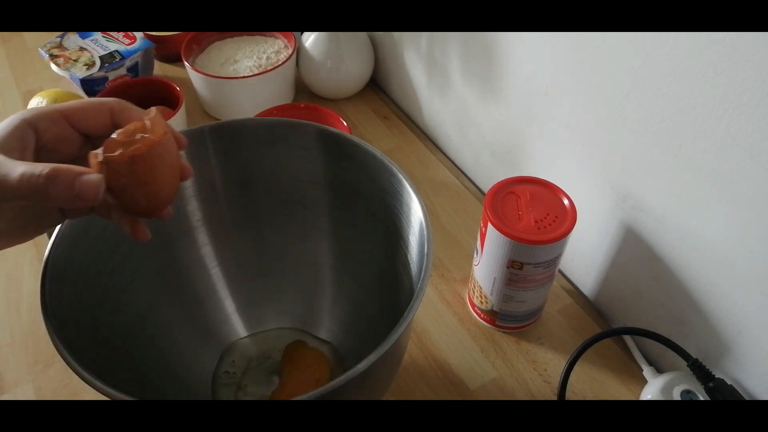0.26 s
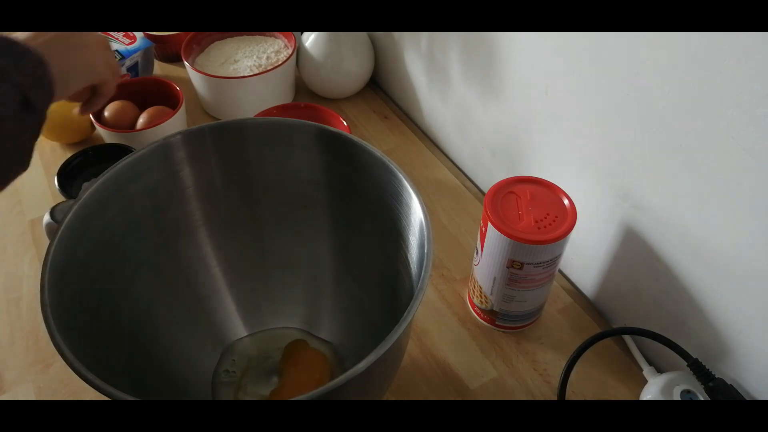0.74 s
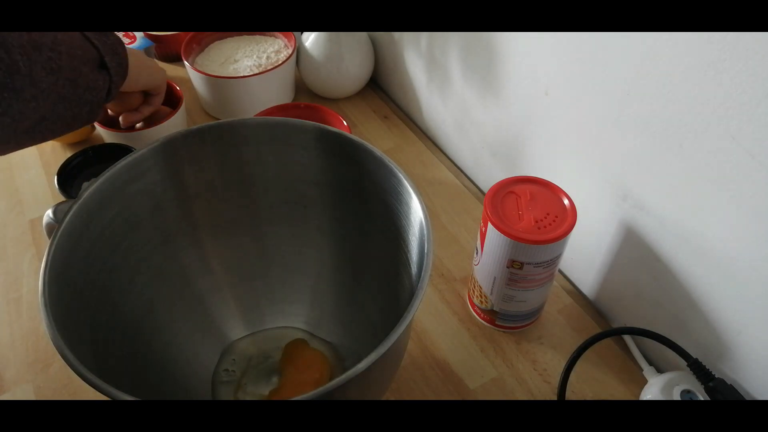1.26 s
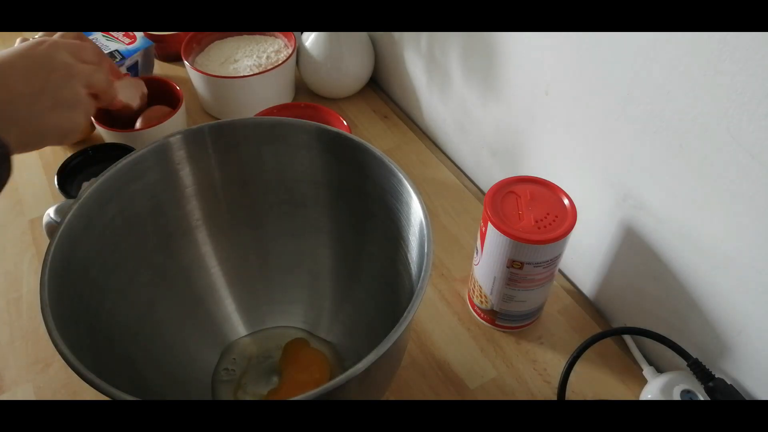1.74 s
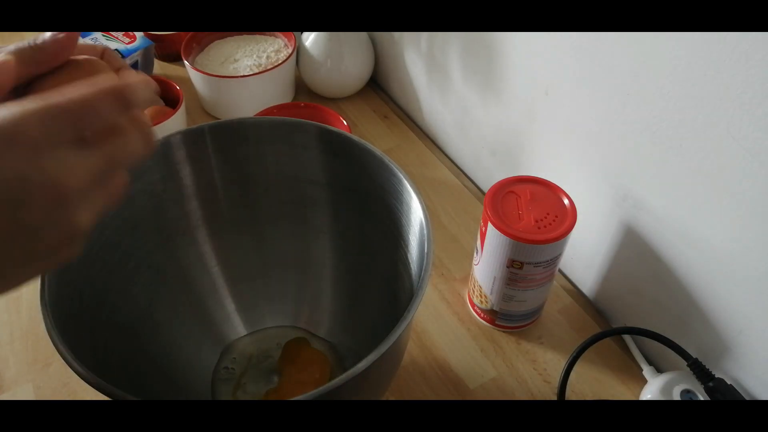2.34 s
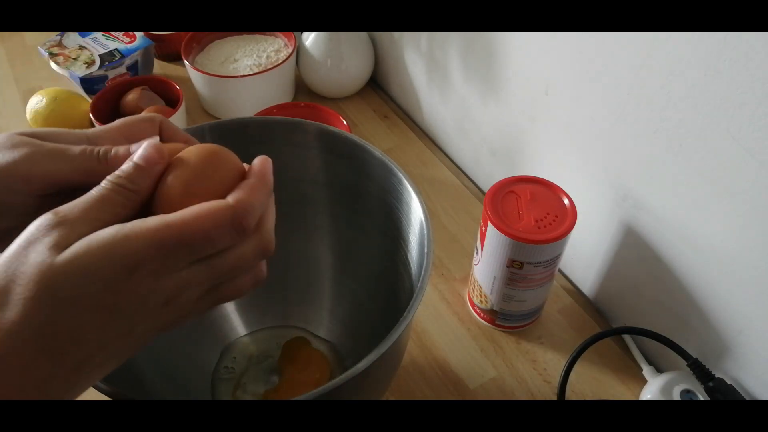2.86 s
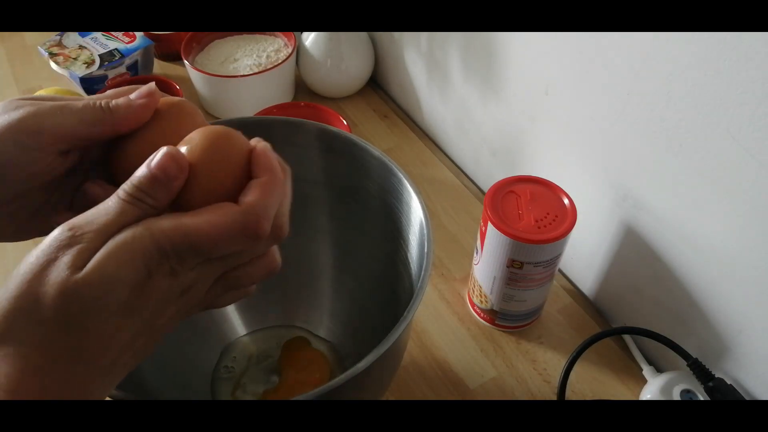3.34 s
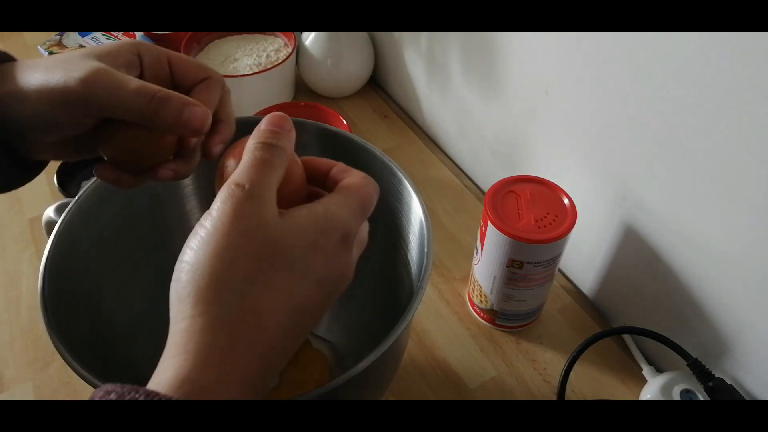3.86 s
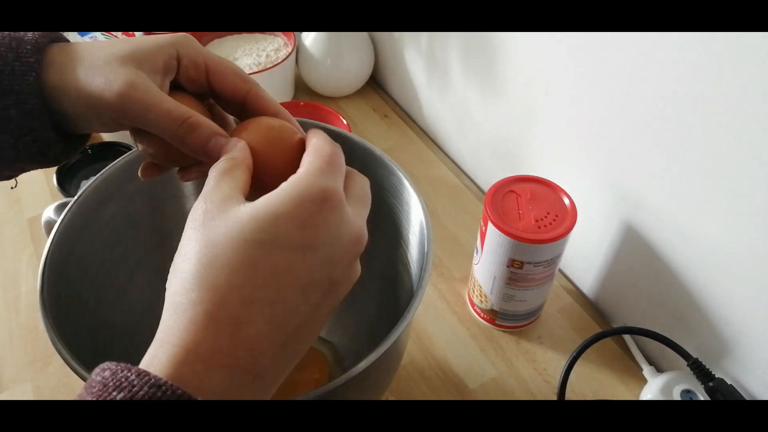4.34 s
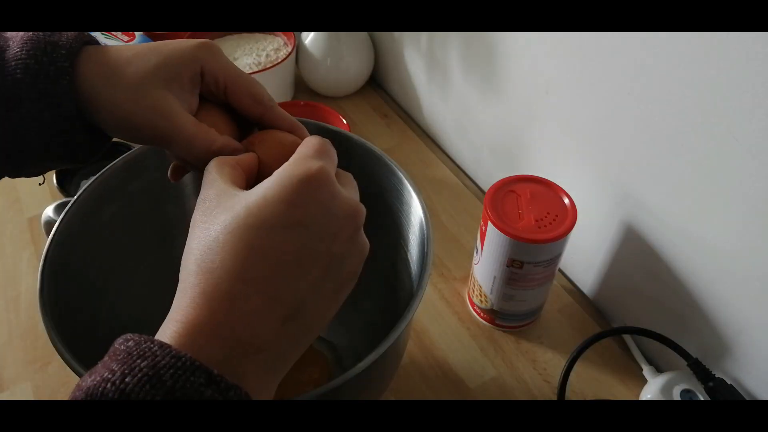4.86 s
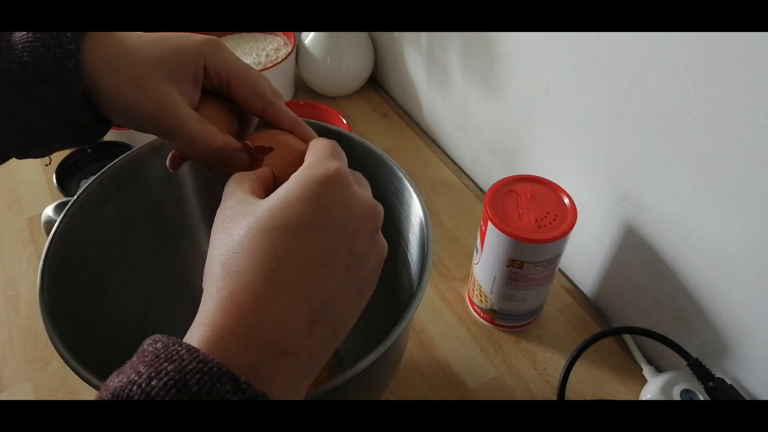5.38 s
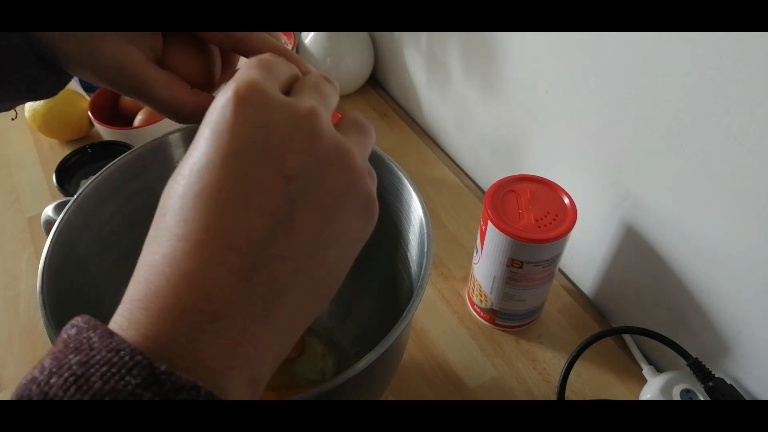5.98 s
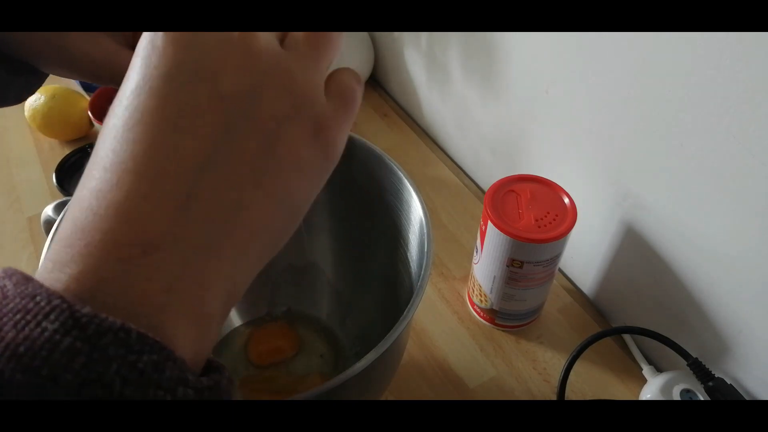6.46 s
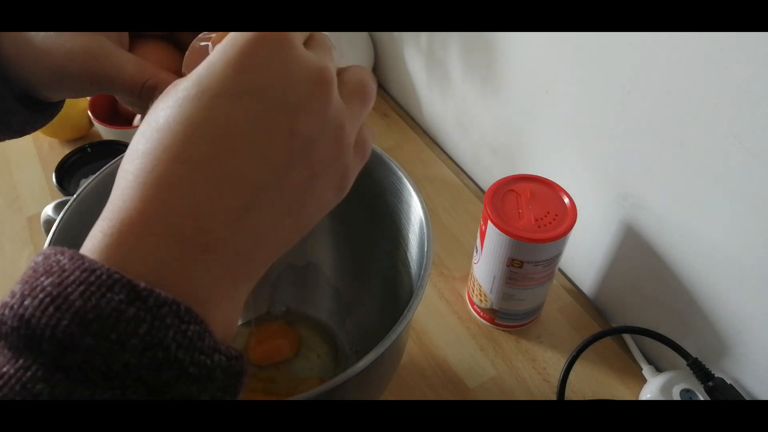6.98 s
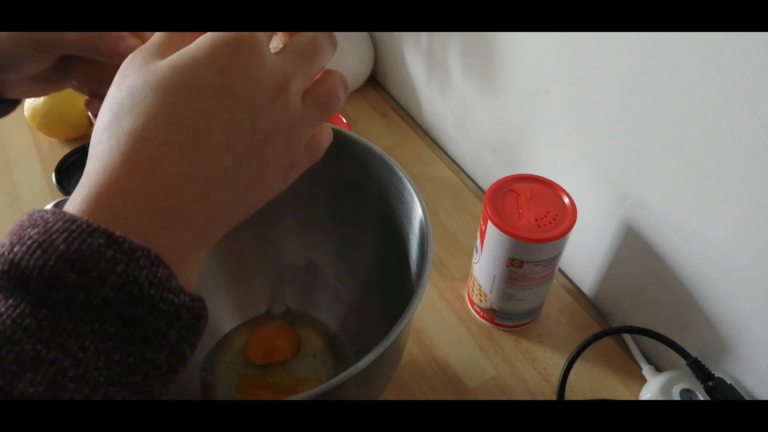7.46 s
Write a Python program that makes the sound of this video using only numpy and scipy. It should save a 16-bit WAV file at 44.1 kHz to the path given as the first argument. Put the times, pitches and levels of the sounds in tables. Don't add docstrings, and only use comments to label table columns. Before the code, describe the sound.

A quiet kitchen with low room tone, far traffic rumble and a faint wavering fridge hum, heard close in stereo with short bright echoes. At 0-0.35 s soft thuds hit the wooden worktop, with a dull egg click, rubbing hands and a rough scrape, strongest near 0.2 s. Low rumble fades until small hollow ticks and rustle at 1.1-1.4 s. China knocks dully at 1.6 s, and eggs tap at 1.9-2.0 s. Whole eggs click at 2.9, 3.1, 3.3 and hardest at 3.5 s. Fingers hiss softly around 3.8-4.0 s. A bowl knock with short chatter comes at 4.7 s. From 4.8 to 5.6 s shell crackles finely; sharper snaps and wet blips follow at 6.1-6.4 s. At 6.6 s the steel bowl knocks and rattles loudly, then more chips, peeling rustle and a faint bowl knock at 7.3 s.

```python
import sys
import numpy as np
from scipy import signal
from scipy.fft import rfft, irfft, next_fast_len
from scipy.io import wavfile
from scipy.ndimage import uniform_filter1d

SR = 44100
rng = np.random.default_rng(int(sys.argv[2]) if len(sys.argv) > 2 else 0)


def elevation(decibels):
    levels = np.asarray(decibels, float)
    return 10 ** (levels / 20)


def waveform_to_disk(signal):
    frames = np.transpose(np.atleast_2d(signal))
    scaled = np.clip(frames, -1, 1) * 32767
    samples = np.round(scaled).astype(np.int16)
    wavfile.write(sys.argv[1], SR, samples)


N = 340452
TIME = np.arange(N) / SR
MS = np.arange(0, N / SR, 1 / 1000)
OPPOSED = np.array([[1], [-1]])


def gains(points, size):
    hz, db = np.transpose(points)
    bin_hz = np.fft.rfftfreq(size, 1 / SR)
    return elevation(np.interp(np.log(bin_hz + 1), np.log(hz), db))


def unit_rms(x):
    return x / np.sqrt(np.mean(x ** 2))


def peak1(x):
    return x / np.max(np.abs(x))


def colour(x, points):
    length = x.shape[-1]
    size = next_fast_len(length)
    return unit_rms(irfft(rfft(x, size) * gains(points, size), size)[..., :length])


def band(x, lo_hz, hi_hz):
    return unit_rms(signal.sosfilt(signal.butter(2, [lo_hz, hi_hz], "band", fs=SR, output="sos"), x))


def high_pass(x, order, hz):
    return signal.sosfilt(signal.butter(order, hz, "high", fs=SR, output="sos"), x)


def even_out(x, bins):
    spectrum = rfft(x)
    return irfft(spectrum / np.sqrt(uniform_filter1d(np.abs(spectrum) ** 2, size=bins)), x.shape[-1])


def tilted(points, top_db):
    split_hz = 7400
    return [(hz, db + top_db * (hz > split_hz)) for hz, db in points]


def walk(rate_hz):
    k = int(SR / rate_hz)
    steps = np.repeat(rng.standard_normal(N // k + 1), k)
    return uniform_filter1d(uniform_filter1d(steps, k), k)[:N]


def effort(s, rise_s, fall_s, held_s=0.):
    before = np.maximum(s - MS, 0)
    after = np.maximum(MS - s - held_s, 0)
    return 10 ** -(before / rise_s + after / fall_s)


def smooth(powers):
    return np.array([np.interp(TIME, MS, np.sqrt(p)) for p in powers])


def panned(x, pan_db):
    return x * elevation(np.array([pan_db, -pan_db]).reshape(2, -1) / 2)


def add(out, s, x, pan_db=0.):
    i = int(s * SR)
    out[:, i:i + len(x)] += panned(x, pan_db)[:, :N - i]


def ring(t, hz, t60_s):
    return np.sin(2 * np.pi * hz * t) * 1000. ** (-t / t60_s)


# frequency in Hz, level in dB per Hz.
ROOM_TONE = [(20, -9), (40, -10.5), (134, -4), (200, -8.5), (300, -23), (700, -19), (1400, -24),
             (3100, -26), (3700, -35.5), (5600, -27.5), (7500, -37), (9000, -37), (11000, -42),
             (16000, -41.5)]
# time in seconds, gain in dB.
TRAFFIC_SWELL = [(0, 4.5), (2.1, -1.5), (2.7, 1.5), (3.3, -5), (3.9, -7), (4.3, 2.5), (5, -4.5),
                 (5.8, -3.5), (6.3, -4), (7.72, 0)]
# frequency in Hz, level in dB, width in Hz.
FRIDGE_HUMS = [(363.7, -71, 53), (1720, -78, 8.4)]
# time in seconds, level in dB.
WHINE_LEVEL = [(0, -67), (1.5, -64), (3.9, -68), (4.45, -57.5), (4.7, -66), (6, -66.5), (7.72, -67.5)]


def kitchen():
    tone_db, whine_hz, waver_db = -58 - 2.5, 552.6, 2.5
    mid, side = colour(rng.standard_normal((2, N)), ROOM_TONE)
    tone = elevation(tone_db) * (mid + high_pass(side, 1, 200.) * OPPOSED)
    low = signal.sosfiltfilt(signal.butter(1, 800., fs=SR, output="sos"), tone)
    out = tone + (elevation(np.interp(TIME, *np.transpose(TRAFFIC_SWELL))) - 1) * low
    for hz, db, width_hz in FRIDGE_HUMS:
        noise = rng.standard_normal((2, N))
        out = out + elevation(db) * np.array([band(v, hz - width_hz / 2, hz + width_hz / 2) for v in noise])
    whine_db = np.interp(TIME, *np.transpose(WHINE_LEVEL)) + 2.5 + waver_db * walk(4.4)
    turn = 2 * np.pi * whine_hz * TIME
    return out + elevation(whine_db) * np.array([np.sin(turn), np.sin(turn + 1.28)])


# start in seconds, level in dB, frequency in Hz, length in seconds.
WORKTOP_THUDS = [(0.035, -32.5, 49.6, 0.013), (0.084, -39.5, 95, 0.099), (0.128, -27.5, 112.7, 0.025),
                 (0.17, -31, 108, 0.019), (0.197, -23, 710, 0.0217), (0.243, -32.5, 85, 0.039),
                 (0.26, -12.5, 675, 0.004), (1.371, -53, 520, 0.045), (1.591, -28.5, 135.5, 0.054),
                 (1.901, -39.5, 112, 0.038), (4.684, -39, 128, 0.032), (4.68, -39, 74, 0.054),
                 (4.684, -37.5, 280, 0.029), (1.59, -31, 200, 0.039), (7.266, -47, 140, 0.055),
                 (6.593, -39, 140, 0.056), (0.257, -39.5, 410, 0.044), (2.248, -40, 212.6, 0.043),
                 (2.335, -57, 180, 0.016), (5.74, -56.5, 380, 0.04), (5.734, -55, 67, 0.061)]


def thuds():
    out, t = np.zeros((2, N)), np.arange(SR // 4) / SR
    for s, db, hz, length_s in WORKTOP_THUDS:
        held = np.minimum(t / 0.017, 1) * np.exp(-np.maximum(t - length_s, 0) * hz / 4.2)
        swell, bend = uniform_filter1d(rng.standard_normal((2, len(t))), size=400) * 20
        cycles = hz * np.cumsum(1 + min(.07, 10 / hz) * bend) / SR
        add(out, s, elevation(db + 2.5 * swell) * held * np.sin(2 * np.pi * cycles), -2)
    return out


# frequency in Hz, level in dB per Hz.
SHELL_SNAP = [(2060, -59), (3500, -22), (4350, -45), (4800, -6.5), (5830, 4.5), (7640, -10.5), (8370, -10),
              (12100, -21), (13100, -24), (15200, -18.5), (15700, -26), (16400, -95)]
# frequency in Hz, level in dB.
EGG_BODY = [(330, -23), (700, 2.5), (1100, 2.5), (1600, 5), (2200, 4), (3200, 7.5), (4000, -24)]
# start in seconds, snap in dB, brightest frequency in Hz,
# thin top in dB, dull body in dB.
EGG_TAPS = [(0.042, -41, 5900, -24, 0), (1.5297, -41, 6130, -19, -27), (1.5654, -44, 6200, -23, -14),
            (1.8800, -24, 5360, 3.5, -10), (1.9814, -31.5, 5270, 2, -10),
            (2.8601, -29.5, 5160, -6.5, -17.5), (2.8723, -29, 5860, -16, -29),
            (3.009, -51, 5270, -32, -1.5), (3.1265, -24, 5550, -14, -44), (3.3177, -19, 5300, -14, -11.5),
            (3.5137, -13.5, 5930, -9, -20)]
# start in seconds, snap in dB, thin top in dB, dull body in dB.
SHELL_BREAKS = [(4.8333, -44.5, 3, 1.5), (5.1552, -39, 9.5, -6), (5.2473, -26, -4, -16),
                (5.27, -37, -13, -23), (5.3267, -33.5, 0, -19), (5.362, -39, 5.5, -14),
                (5.3963, -33, 4.5, -36), (5.5298, -27.5, -19, -18), (5.539, -36.5, 1.5, -20.5),
                (5.743, -60, 26, 2), (5.827, -51, 14.5, -25), (6.1154, -34, -11, -33),
                (6.177, -21, -2, -60.5), (6.192, -31, 3, -32), (6.227, -21, -14, -25),
                (6.3028, -32, 1, -7.5), (6.3163, -39, 9, -32), (6.683, -56, 17, -20),
                (6.76, -31.5, -10, -18), (7.145, -46, 4, -5)]


def shells():
    out, t = np.zeros((2, N)), np.arange(SR // 6) / SR
    lead = 200
    # splinter time in seconds, splinters against first snap, clack in dB
    taps = [(*tap, 0.0022, 0.51, 0.5) for tap in EGG_TAPS]
    breaks = [(s, db, 5730, top_db, body_db, 0.0024, 0.12, -6.5) for s, db, top_db, body_db in SHELL_BREAKS]
    for s, snap_db, hz, top_db, body_db, splinter_s, grit, clack_db in taps + breaks:
        chance = rng.standard_normal((2, len(t)))
        burst = grit * chance[0] * np.abs(chance[1]) * np.exp(-t / splinter_s)
        burst[0] = 1
        burst = even_out(burst, 50) * (t < .1)
        clack = signal.fftconvolve(burst, ring(t, hz, .003))[:len(t)]
        clack = np.roll(peak1(high_pass(clack, 8, 4500)), lead)
        late = np.roll(burst, lead)
        snap = peak1(colour(late, tilted(SHELL_SNAP, -5.5)))
        top = peak1(colour(late, tilted(SHELL_SNAP, 19.7)))
        body = peak1(colour(late, EGG_BODY))
        crack = snap + elevation(clack_db) * clack + elevation(top_db + 0.5) * top + elevation(body_db + 7.5) * body
        add(out, s + 0.001257 - lead / SR, elevation(snap_db) * crack)
    return out


# frequency in Hz, level in dB per Hz.
SKIN_HISS = [(1300, -16.5), (2240, -12), (3800, -4), (4040, -5.5), (5350, 7), (6120, 6), (7630, -12),
             (8670, -9.5), (11000, -21.5), (15000, -25.5), (15900, -19), (16400, -50)]
# full at in seconds, held in seconds, level in dB,
# dull part in dB, thin part in dB.
BRUSHES = [(0.05, 0.034, -52.5, -9, -22), (0.086, 0.022, -43.5, -2, -0.5), (0.216, 0.011, -46, -7, -20),
           (1.105, 0.026, -53, -20, -5.5), (1.14, 0.0086, -44.5, -1, -27), (1.36, 0.034, -57, 0, -36),
           (1.538, .004, -49.5, -5, -12), (2.34, 0.028, -68, -10, -0.5), (3.775, 0.044, -50, -21, -6),
           (4.52, 0.25, -90.5, -10, 11.5), (4.63, 0.044, -78.5, -15, 12), (4.696, 0.0033, -66, 11, 14.5),
           (5.262, 0.0097, -57, 9, 9), (5.76, .05, -93, -10, -9), (5.915, 0.016, -53.5, -5, -2.5),
           (6.314, 0.0027, -70.5, 12, 13), (6.553, 0.03, -68.5, -19, -25), (6.62, 0.034, -57, 0, -7),
           (7.146, 0.0034, -105, 39.5, 5), (7.25, 0.034, -69, 9, 4)]
# full at in seconds, held in seconds, level in dB,
# dull part in dB, thin part in dB.
SHELL_PICKING = [
    (3.97, 0.064, -50.5, -6, 2.5),
    (4.99, 0.2, -52.5, -5.5, -2.5),
    (5.37, 0.13, -61, -0.5, 3.5),
    (6.11, 0.062, -53.5, -1.5, 5),
    (6.8, 0.1, -54.5, -10.5, -2.5),
    (6.94, 0.036, -62, -19, -6),
    (7.35, 0.12, -54, -11.5, -4),
    (7.55, 0.012, -65, -16, -7),
]


def rubs():
    powers, spread, grain_db = 0, 0.84, 3.2
    for rows, rise_s, fall_s in ((BRUSHES, 0.035, 0.083), (SHELL_PICKING, 0.23, 0.097)):
        for s, held_s, db, dull_db, thin_db in rows:
            levels = elevation([[db], [db + dull_db], [db + thin_db]])
            powers = powers + (levels * effort(s, rise_s, fall_s, held_s)) ** 2
    mid, side = rng.standard_normal((2, 3, 1, N))
    grain = elevation(grain_db * np.minimum(rng.exponential(size=N), 2 * np.pi))
    slips = (mid + spread * side * OPPOSED) * grain
    bright = elevation(3.5 * walk(35.)) * colour(slips[0], tilted(SKIN_HISS, 2.3))
    dull = elevation(4.3 * walk(25.51)) * band(band(slips[1], 2490.0, 4200.0), 1550.0, 3580.0)
    thin = elevation(2.5 * walk(45.)) * colour(slips[2], tilted(SKIN_HISS, 14.7))
    return np.sum(smooth(powers)[:, None] * [bright, dull, thin], axis=0)


# hardest at in seconds, rumble in dB, scrape in dB,
# rise in seconds per 20 dB, fall in seconds per 20 dB.
WOOD_DRAGS = [(0.116, -35, -29, 0.082, 0.059), (0.17, -37, -43, 0.18, 0.15),
              (0.214, -27, -17.5, 0.014, 0.036), (0.33, -56, -40, .2, 0.32), (0.506, -36, -68, 0.72, 0.15),
              (0.662, -38.5, -72, 0.06, 0.075), (1.253, -58, -40, 0.0077, 0.028),
              (1.375, -45, -39.5, 0.068, 0.06), (1.652, -34, -31.5, 0.0042, 0.028),
              (1.716, -42, -59, .05, 0.19), (1.89, -37, -56, 0.017, 0.24), (2.262, -37, -55, 0.013, 0.087),
              (3.018, -53.5, -54.5, 0.065, 0.31), (5.752, -47.5, -77, 0.081, 0.021),
              (5.82, -55.5, -84, 0.17, 0.17)]


def drags():
    powers, judder_db = 0, 3.5
    for s, rumble_db, scrape_db, rise_s, fall_s in WOOD_DRAGS:
        powers = powers + (elevation([[rumble_db], [scrape_db]]) * effort(s, rise_s, fall_s)) ** 2
    board, hollow = smooth(powers)
    slips = rng.standard_normal((3, N))
    rumble = board * elevation(judder_db * walk(30.02)) * band(slips[0], 30.0, 254.0)
    rasp = band(slips[1], 578.0, 887.0) + 0.51 * band(slips[2], 770.0, 1850.0)
    scrape = hollow * elevation(judder_db * walk(43.64)) * rasp
    return panned(elevation(-8.5) * (rumble + scrape), 0.)


# frequency in Hz, width in Hz, level
# in dB.
HOUSEHOLD_MODES = [
    [(86, 19, 7.5), (453, 26, -8), (680, 51, 9.5), (1120, 200, -6), (2400, 49, -17), (2760, 47, -24)],
    [(250, 180, 5.5), (614, 46, -5), (875, 330, 0), (1790, 130, -65), (2270, 42, -41), (2880, 320, -24),
     (3240, 95, -26)],
    [(115, 18, -22), (1260, 98, -34), (1490, 24, -6), (1750, 44, -9), (2800, 74, -10), (3430, 190, -13),
     (4220, 25, -47), (4550, 28, -25), (4800, 28, -9.5)],
]
# frequency in Hz, width in Hz, level in dB.
BOWL_MODES = [
    [(92, 95, 9), (344, 77, 5.5), (1000, 32, -6), (1180, 28, 2.5), (1510, 16, -26), (1940, 41, -3.5),
     (2150, 23, -17), (2520, 22, -19), (2900, 53, -8.5), (3270, 20, -12)],
    [(335, 10, 7), (636, 40, -16), (755, 15, -6), (1060, 29, -10), (1460, 48, 14), (1810, 65, 10),
     (2030, 21, 5), (2130, 110, 3), (2380, 26, -6), (2940, 40, 11.5), (3360, 240, -25)],
    [(136, 65, 9), (302, 59, 1), (576, 36, -19), (990, 190, 6.5), (1390, 43, 2), (1810, 120, -18),
     (2090, 31, -21), (2640, 100, -16), (3380, 81, -3.5)],
]
BODY_PANS = [-11, 3.5, 8.5, 12, -13.5, -4.5]
# start in seconds, ring in dB, clatter in dB, its treble in dB, contact in seconds.
BODY_KNOCKS = [
    (0.206, -21, -40.5, -26.5, 0.017),
    (1.585, -13.5, -38.5, -26.5, 0.028),
    (1.88, -30, -49, -25, 0.041),
    (4.678, -24, -37.5, -24.5, 0.047),
    (6.5915, -22, -38, -39, 0.026),
    (7.263, -29, -41.5, -19.5, 0.038),
]
# frequency in Hz, level in dB.
SURFACE_CLATTER = [(60, -40), (150, 11), (300, 11.5), (800, 9.5), (1500, 2.5), (3000, 4), (4000, -27.5)]


def knocks():
    out, t = np.zeros((2, N)), np.arange(SR // 2) / SR
    bodies = [*HOUSEHOLD_MODES, *BOWL_MODES]
    for body, pan_db, (s, ring_db, clatter_db, treble_db, contact_s) in zip(bodies, BODY_PANS, BODY_KNOCKS):
        chance = rng.standard_normal((3, len(t)))
        touch = np.exp(-t / contact_s) * np.minimum(t / 0.0032, 1)
        damped = [(hz, max(width_hz, 45 + hz / 7), db) for hz, width_hz, db in body]
        modes = sum(elevation(db) * width_hz * ring(t, hz, 2.2 / width_hz) for hz, width_hz, db in damped)
        struck = peak1(signal.fftconvolve(chance[0] ** 3 * touch, modes)[:len(t)])
        add(out, s - .0025, elevation(ring_db + 0.5) * struck, pan_db)
        clatter = elevation(clatter_db) * colour(chance[1], SURFACE_CLATTER)
        treble = elevation(ring_db + treble_db) * colour(chance[2], tilted(SHELL_SNAP, -0.5))
        add(out, s - .0025, elevation(3.5) * (clatter + treble) * touch, pan_db)
    return out


# start in seconds, level in
# dB, frequency in Hz, T60 in seconds.
HOLLOW_NOTES = [(1.248, -38, 1490, 0.036), (6.815, -40, 1690, .04), (1.313, -39, 1970, 0.017),
                (1.322, -40, 1740, 0.02), (1.332, -43, 1545, 0.024), (1.345, -40, 806, 0.045),
                (1.565, -32, 907, 0.1), (1.984, -43.5, 1543, 0.12), (2.0, -46.5, 3240, 0.18),
                (2.864, -35, 4930, 0.03), (3.128, -38, 4800, 0.014), (5.156, -45.5, 970, 0.016),
                (5.276, -41, 2310, 0.036), (5.396, -46, 1402, 0.07), (5.543, -40, 5310, 0.028),
                (5.817, -56, 4200, 0.015), (5.915, -47, 2600, 0.022), (6.1161, -34, 1900, 0.063),
                (6.304, -37, 2100, 0.017), (6.228, -41, 1610, 0.011), (6.76, -40.5, 1390, 0.029),
                (6.5944, -30, 1750, 0.033), (6.596, -26, 2912, 0.04), (1.136, -44, 3140, 0.08)]


def notes():
    out, t = np.zeros((2, N)), np.arange(SR // 6) / SR
    for s, db, hz, t60_s in HOLLOW_NOTES:
        scuff, loose = rng.standard_normal((2, len(t)))
        scuff = scuff * np.exp(-t / 0.0022)
        scuff[0] = 3
        span = int(t60_s * SR / 10)
        rattle = 1 + .5 * np.sqrt(span) * uniform_filter1d(loose, size=span)
        note = signal.fftconvolve(scuff, rattle * ring(t, hz, t60_s))[:len(t)]
        add(out, s, elevation(db) * peak1(band(note, hz / 1.25, hz * 1.25)))
    return out


# start in seconds, level in dB, frequency in Hz, T60 in seconds,
# glide as a share per 10 ms.
WET_DRIPS = [(4.6755, -24, 315, .03, -0.013), (5.3965, -40, 1400, 0.096, 0.0015),
             (6.604, -32, 326, 0.24, 0), (1.565, -36, 880, .05, -0.008), (3.318, -37, 677, .03, 0),
             (6.1166, -30, 1800, 0.05, 0.042), (6.3025, -43, 1130, .02, .15),
             (6.3731, -41.5, 2630, .02, .13), (6.4066, -49, 2650, .022, 0.14),
             (6.4305, -44, 2050, 0.028, .05), (7, -55, 1900, .02, .1), (1.313, -48, 2050, .05, -.09),
             (2.2, -48, 790, .03, .1)]


def drips():
    out, t = np.zeros((2, N)), np.arange(SR // 8) / SR
    for s, db, hz, t60_s, glide in WET_DRIPS:
        pitch_hz = hz * (1 + glide * np.minimum(t / .01, 3))
        tone = np.sin(2 * np.pi * np.cumsum(pitch_hz) / SR)
        add(out, s, elevation(db) * tone * 1000. ** (-t / t60_s))
    return out


# start in seconds, level in dB, frequency in Hz, left minus right in dB.
SHELL_CHIPS = [(2.863, -44, 2830, -2), (3.318, -40, 1480, 2), (4.5292, -48, 7000, 2),
               (4.5925, -56, 5900, -9), (4.6259, -47, 8550, 5), (4.678, -29, 5930, 2),
               (5.014, -31.5, 5600, 0), (5.021, -42, 8800, 0), (5.038, -42, 8400, 0), (5.066, -42, 5500, 0),
               (5.105, -44, 6000, 0), (5.1512, -36, 9000, 2), (5.209, -36.5, 10000, 0),
               (5.272, -31.5, 6000, 1), (6.762, -38.5, 3500, 0), (5.75, -38.5, 9200, 16),
               (5.826, -38, 9700, 12), (5.9125, -37, 5600, 0), (6.0397, -41, 6000, 1),
               (6.0662, -43, 8000, 0), (6.085, -32, 5960, 0), (6.1772, -26, 8100, -2),
               (6.3175, -30.5, 6630, -10), (6.4069, -54, 6000, -10), (6.5047, -57, 8000, -6),
               (6.559, -50, 8000, -4), (6.589, -24.5, 5750, 9), (6.683, -43, 14000, 0),
               (6.7032, -38, 5650, -5), (6.723, -39, 13000, -1), (6.761, -43, 13000, 0),
               (6.795, -38, 6030, -7), (6.816, -39, 13000, 0), (7.1287, -56, 6000, -2),
               (7.2225, -60, 6000, -2), (7.223, -53, 11000, 0), (7.32, -42, 8800, 0),
               (6.1776, -36, 14500, 0), (7.2608, -32.5, 7800, 7), (7.2704, -31.5, 5630, -6)]


def chips():
    out, t = np.zeros((2, N)), np.arange(SR // 20) / SR
    for s, db, hz, pan_db in SHELL_CHIPS:
        burst = (rng.standard_normal(len(t)) + 5 * (t == 0)) * np.exp(-t / 0.00104)
        add(out, s, elevation(db) * peak1(band(burst, hz / 1.2, hz * 1.11)), pan_db)
    return out


# start in seconds, level in dB, bounces per second, ring in Hz, fade in seconds.
BOWL_CHATTER = [
    (6.5945, -16, 335, 1530, 0.022),
    (4.684, -26.5, 327, 880, 0.046),
    (7.268, -35, 310, 1560, .025),
]


def chatter():
    out, t = np.zeros((2, N)), np.arange(SR // 50) / SR
    for s, db, rate_hz, hz, fade_s in BOWL_CHATTER:
        chance = rng.standard_normal((2, 30))
        after_s = np.cumsum(1 + .06 * chance[0]) / rate_hz - 1 / rate_hz
        for late_s, size_db in zip(after_s, 2.8 * chance[1]):
            add(out, s + late_s, elevation(db + size_db) * np.exp(-late_s / fade_s) * ring(t, hz, 0.0038))
    return out


# frequency in Hz, T60 in seconds.
ROOM_DECAY = [(100, 0.3), (500, 0.36), (2000, 0.42), (6000, 0.41), (14000, 0.23)]


def echoes():
    t, tail = np.arange(int(.6 * SR)) / SR, 0
    hz, t60_s = np.transpose(ROOM_DECAY)
    for mid_hz in 60 * 2. ** np.arange(9):
        noise = rng.standard_normal((2, len(t)))
        mid, side = band(noise, mid_hz / 1.71, min(mid_hz * 1.635, 20000.))
        both = mid + min(mid_hz / 740.0, 1) * side * OPPOSED
        decay = 1000. ** (-t / np.interp(np.log(mid_hz), np.log(hz), t60_s))
        tail = tail + both * np.sqrt(mid_hz) * decay
    tail = tail * np.clip(t / .0015, 0, 1) * (1 + 3 * np.exp(-t / .006))
    tail = even_out(tail, 80)[:, :SR // 2]
    return tail / np.sqrt(np.sum(tail ** 2) / 2)


def walls(x):
    turns = np.pi * TIME / .31 - np.pi * np.arange(3)[:, None] / 3
    shares = np.cos(turns) ** 2 / np.sqrt(9 / 8)
    size, mono = next_fast_len(N + SR), x.mean(axis=0)
    return irfft(sum(rfft(mono * share, size) * rfft(echoes(), size) for share in shares), size)[:, :N]


# time in seconds, left minus right in dB.
HAND_PLACES = [(0, 1), (.7, -3), (1.2, 0.5), (1.7, 1), (2.2, 3), (2.8, 3), (3.4, 1), (3.9, -0.5), (4.5, 18),
               (5, 11.5), (5.5, 5), (5.8, 13), (6.1, 4), (6.7, -6), (7.3, 0.5), (7.72, -10)]


def scene():
    right_lag = 10
    place_db = np.interp(TIME, *np.transpose(HAND_PLACES))
    place = elevation(np.array([place_db, -place_db]) / 2)
    cracks, hollow, wet, bounces = shells() * place, notes() * place, drips(), chatter()
    near = high_pass(knocks() + chips() + rubs() * place + drags(), 4, 90.)
    direct = near + cracks + hollow + wet
    direct = np.array([direct[0], np.roll(direct[1], right_lag)]) + bounces
    sent = near + elevation(-2.5) * cracks + elevation(-2.5) * (hollow + bounces) + elevation(-3) * wet
    return direct + elevation(3) * walls(sent) + thuds() + kitchen()


def top_cut(x):
    return signal.sosfilt(signal.butter(12, 16520, fs=SR, output="sos"), x)


# frequency in Hz, left minus right in dB.
PORT_TILT = [(25, -5), (60, 0.5), (200, -2), (400, 4.5), (700, 4.5), (1300, -2), (2400, -1), (3600, -1.5),
             (5000, -5.5), (6100, -11), (7000, -12.5), (7800, 11.5), (9500, 10.5), (11500, 2), (15000, -6)]


def record(dry):
    size = next_fast_len(N)
    tilt = np.sqrt(gains(PORT_TILT, size))
    heard = irfft(rfft(dry, size) * np.array([tilt, 1 / tilt]), size)[:, :N]
    heard = signal.sosfiltfilt(signal.butter(12, 15650, fs=SR, output="sos"), heard)
    return top_cut(heard)


dry = scene()
out = record(dry)
waveform_to_disk(out)
```